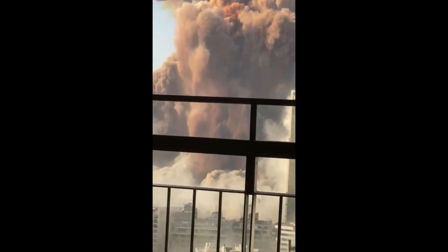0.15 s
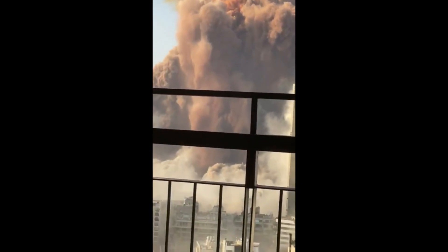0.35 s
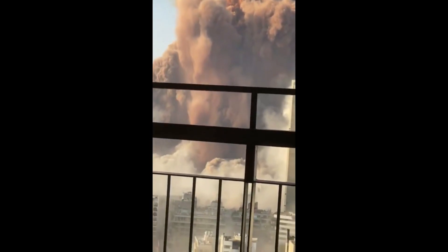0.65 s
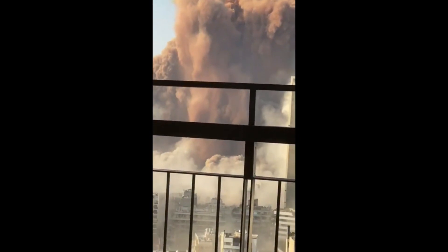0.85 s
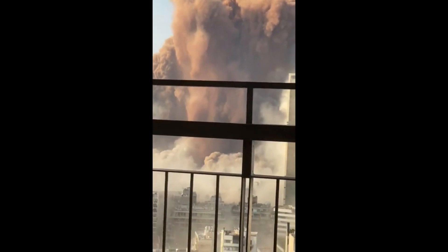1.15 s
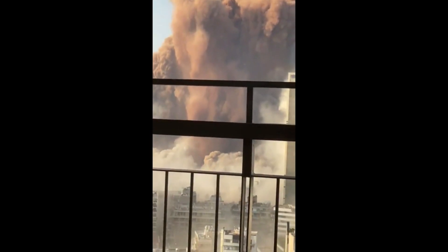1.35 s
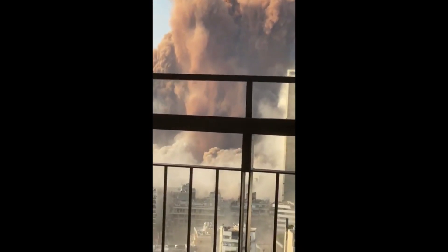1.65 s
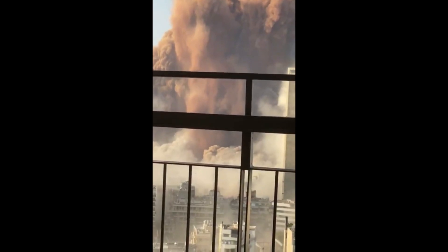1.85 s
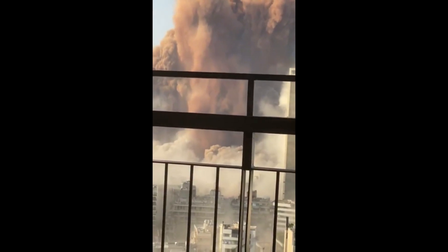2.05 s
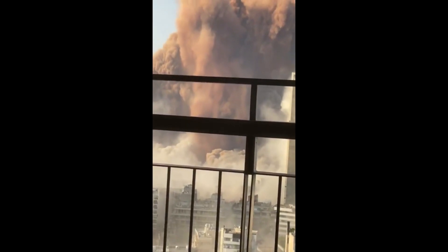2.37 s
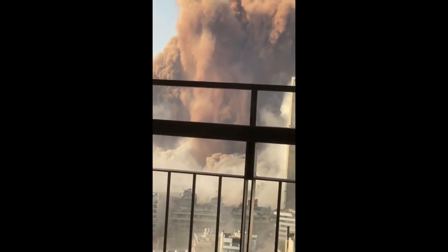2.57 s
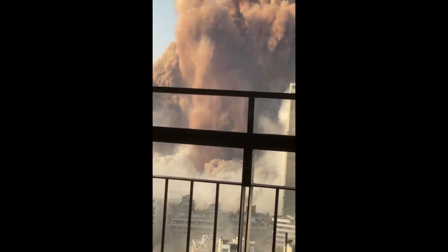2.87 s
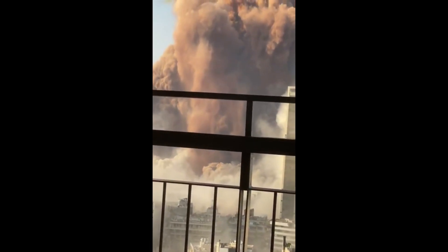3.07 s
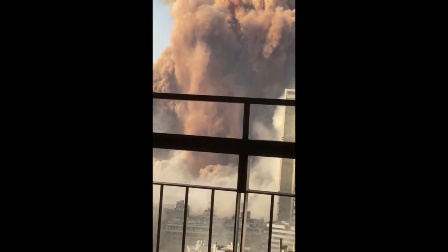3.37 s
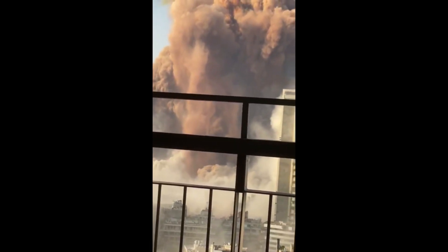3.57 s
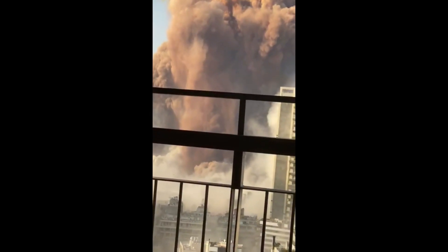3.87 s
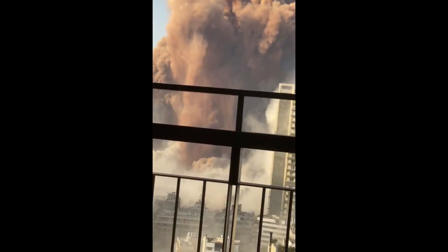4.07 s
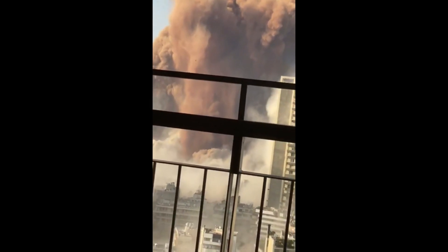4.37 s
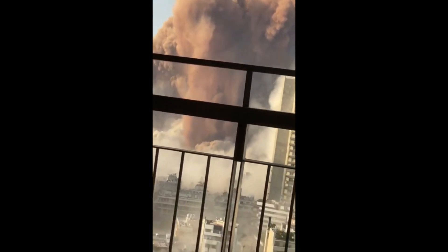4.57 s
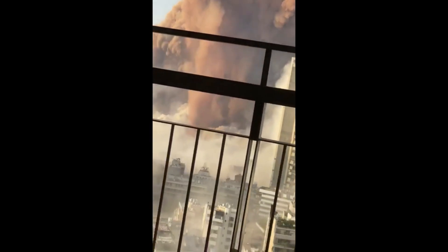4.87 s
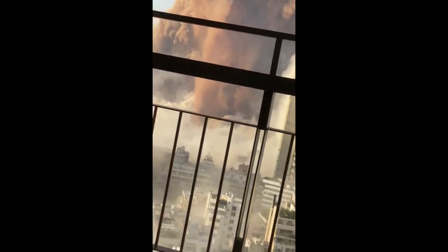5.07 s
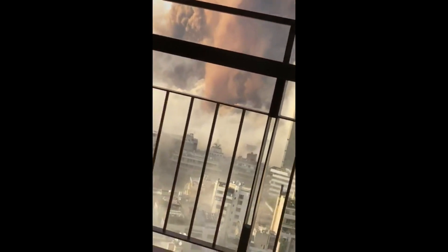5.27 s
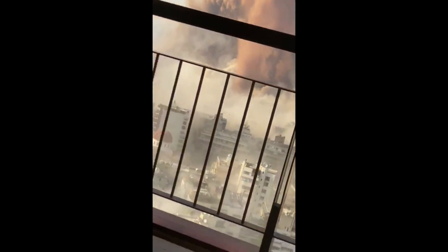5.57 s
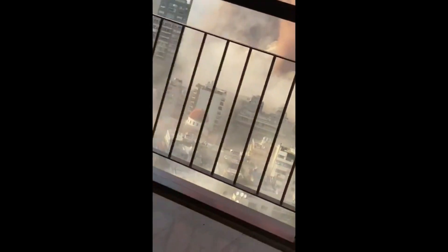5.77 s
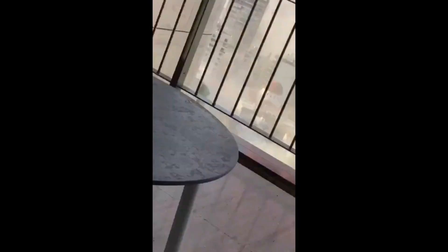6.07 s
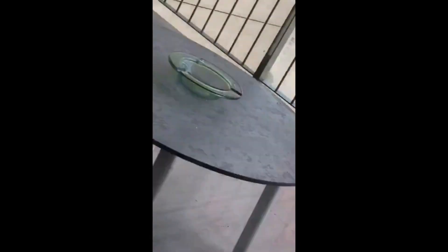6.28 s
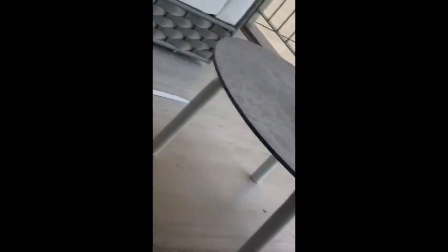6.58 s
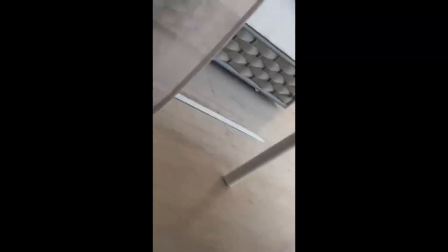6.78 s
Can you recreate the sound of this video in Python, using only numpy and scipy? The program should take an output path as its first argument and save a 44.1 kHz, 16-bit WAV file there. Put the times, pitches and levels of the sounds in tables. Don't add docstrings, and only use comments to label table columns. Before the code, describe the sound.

Heavy thunderous roar keeps rolling and slowly grows, dotted with dry clicks, then a sharp sheet-metal bang, thin distant horns and a clattering finish.

```python
import sys
import numpy as np
from scipy import signal
from scipy.fft import rfft, irfft, next_fast_len
from scipy.io import wavfile
from scipy.ndimage import uniform_filter1d

SR = 44100
rng = np.random.default_rng(int(sys.argv[2]) if len(sys.argv) > 2 else 0)


def transcribe(u):
    v = np.clip(np.atleast_2d(u).T, -1, 1)
    q = np.round(v * 32767).astype(np.int16)
    wavfile.write(sys.argv[1], SR, q)


def undo_db(level):
    steps = np.asarray(level, float) / 20
    return 10 ** steps


N = 305613
T = np.arange(N) / SR
PADDED = next_fast_len(N + 4096)
HZ = np.arange(PADDED // 2 + 1) * SR / PADDED + 1e-3

# t/s, level/dB
NEARNESS_DB = [
    (0.0, -50.5),
    (1.41, -46.5),
    (1.6, -44.5),
    (3.82, -41),
    (4.09, -39),
    (5.83, -36.5),
    (5.96, -35.5),
    (6.31, -38),
    (6.93, -35),
]
# t/s, half length/s, thunder lift/dB, body lift/dB
SWELLS = [(.05, .08, 2.5, 4), (.32, .06, 6.5, 1.5), (.44, .03, .1, 4), (.74, .11, 7, 1.5),
          (1.01, .04, 6, .1), (1.16, .04, 3, 1.5), (1.3, .035, 5, 2), (1.8, .05, 6, .1),
          (2.0, .08, 3.5, .1), (2.24, .1, 3, .1), (2.72, .04, 7, .1), (2.82, .025, 4, .1),
          (3.26, .06, 3, 3), (3.46, .07, 4.5, .1), (3.62, .035, 6, .1), (3.73, .04, 3.5, .1),
          (3.86, .03, 4.5, .1), (3.99, .03, 6, 4), (4.1, .07, 1.5, 2.5), (4.41, .06, 6, 6),
          (4.66, .04, 4.5, 4), (4.79, .05, 8, 6), (5.1, .1, 2.5, .1), (5.23, .05, 1.5, 2.5),
          (5.6, .12, 2.5, 2.5), (5.94, .11, 9, 6), (6.31, .06, 8, 1.5), (6.44, .03, 5, .1),
          (6.63, .11, 4.5, 2), (6.86, .05, 8, 3)]
# f/Hz, density/dB per Hz
THUNDER_COLOUR = [(14, -60.5), (25, -28), (32, -20), (45, -4.5), (62, 1.5), (94, -1), (130, -5.5),
                  (170, -12.5), (260, -40.5), (440, -120)]
# f/Hz, density/dB per Hz
BODY_COLOUR = [(90, -14), (140, -3.5), (200, -1), (300, -5), (450, -12), (700, -20.5), (1100, -33),
               (2000, -60.5), (4000, -120)]
# f/Hz, density/dB per Hz
ROAR_COLOUR = [(250, -10.5), (450, 1), (700, 0), (1000, -2.5), (1750, -5), (2600, -12), (3700, -20.5),
               (5500, -29), (8000, -40.5), (11500, -51.5)]
# f/Hz, density/dB per Hz
HISS_COLOUR = [(1500, -20), (3000, 0), (5000, -4.5), (8000, -14.5), (11500, -19.5), (13000, -40.5)]
# t/s, level/dB, centre f/Hz, width/octaves
TICKS = [(.352, -53, 4000, 1.3), (.472, -46, 3800, 1.9), (1.064, -43, 3400, .9), (1.36, -57, 5000, 1.4),
         (1.55, -58, 7500, 1.2), (1.71, -57, 6600, .25), (1.738, -54, 6600, .25), (2.445, -45, 5500, 1.5),
         (4.96, -54, 7900, .2), (5.07, -52, 7800, .2), (5.075, -53, 6100, .15), (5.52, -51, 5200, .5),
         (6.09, -44, 3100, .2), (6.585, -60, 9000, .9), (6.742, -48, 6500, 1.3), (6.77, -50, 10500, .35)]
# t/s, level/dB, centre f/Hz, width/octaves, t60/s
SPILLS = [
    (.485, -52, 3500, 1.4, .5),
    (1.064, -55, 4970, .71, .6),
    (2.447, -49.5, 5200, .6, .35),
    (3.45, -64, 10800, .3, .3),
    (5.43, -62, 11250, .03, .6),
    (5.56, -57, 7200, .8, .4),
    (5.96, -42, 2500, .4, .54),
    (6.76, -45, 5500, .9, 1.1),
]
# f/Hz, density/dB per Hz
GRIT_COLOUR = [(1800, -10), (3000, 1), (4500, -1), (6200, -5), (8000, -4), (10500, 0.5), (11300, -14)]
# start/s, end/s, f/Hz, level/dB
HORNS = [(4.6, 5.0, 3101, -54.5), (5.32, 5.53, 3103, -46.5), (5.54, 5.63, 3103, -52),
         (5.68, 5.78, 3101, -49), (5.9, 5.99, 3101, -48.5), (6.06, 6.12, 3101, -48),
         (5.23, 5.48, 3494, -54), (5.52, 5.76, 3494, -55), (5.28, 5.7, 2662, -53.5),
         (5.9, 6.12, 2665, -51.5), (4.6, 4.75, 3989, -61), (5.4, 5.9, 3989, -64), (6.18, 6.42, 3989, -58.5),
         (5.3, 5.6, 3193, -57), (6.66, 7.0, 1461, -44), (6.68, 7.0, 974, -47.5), (6.62, 6.8, 1211, -50)]
# t/s, level/dB, rise/s, first t60/s, late level/dB, late t60/s
BLOW = (4.758, -23.5, 0.014, .27, -4, .6)
# f/Hz, width/Hz, level/dB
SHEET_MODES = [(2010, 140, 6), (2470, 80, -6), (3200, 90, -4), (3500, 89, -6), (4390, 200, -11),
               (6140, 120, -6), (7730, 120, -13), (8340, 270, -16.5)]
# f/Hz, density/dB per Hz
CRASH_COLOUR = [(300, -14.5), (1000, -8), (2200, -7.5), (3500, -8.5), (5000, -13), (6500, -17),
                (8500, -19.5), (11500, -25), (13000, -45.5)]
# f/Hz, level/dB, t60/s
GLASS_MODES = [(10115, -40, 1.3), (10060, -46, 1.0), (9960, -46, .8), (10190, -45, .8)]
# f/Hz, left lead/rad
LEAD_RAD = [(0, 0), (1980, -0.0), (2580, 1.2), (3270, 0.12), (4130, 0.0), (4570, 1.45), (4910, 4),
            (5250, 6.3), (6800, 6.5), (7670, 7.4), (8010, 7.5), (9220, 9.0), (10200, 9.5), (11200, 9.5)]
# f/Hz, left minus right/dB
TILT_DB = [(60, 0.05), (96, 0.05), (150, -0.1), (250, 0.1), (400, 0.5), (640, 2.5), (1030, 3), (1660, 0.5),
           (2660, 0.0), (4270, 0.0), (6870, 0.1), (11000, 0.1)]
# f/Hz, level/dB
SCATTER_DB = [(60, -34), (300, -22), (700, -14), (1300, -15), (1900, -15.5), (2600, -6.5), (3600, -16),
              (4900, -15.5), (6000, -16.5), (8000, -2.5), (10500, -3.5)]


def rms_one(x):
    return x / np.sqrt(np.mean(x ** 2) + 1e-20)


def at_hz(points, hz=HZ):
    marks, value = np.transpose(points)
    return np.interp(np.log(hz), np.log(marks), value)


def shaped(gain):
    spectrum = rfft(rng.standard_normal(PADDED)) * gain
    return rms_one(irfft(spectrum, PADDED)[:N])


def noise(colour):
    low_cut = np.minimum(HZ / colour[0][0], 1) ** 4
    return shaped(undo_db(at_hz(colour)) * low_cut)


def drift(rate_hz):
    pole = np.exp(-128 * np.pi * rate_hz / SR)
    white = rng.standard_normal(N // 64 + 1002)
    slow = signal.lfilter([1], [1, -2 * pole, pole * pole], white)[1000:]
    return np.interp(np.arange(N) / 64, np.arange(len(slow)), rms_one(slow - slow.mean()))


def burst(since_s, rise_s, t60_s):
    decay = undo_db(-60 * np.maximum(since_s - rise_s, 0) / t60_s)
    return np.clip(since_s / rise_s, 0, 1) * decay


def bump(t, centre_s, half_s):
    return np.exp(-((t - centre_s) / half_s) ** 2)


def nearness():
    return np.interp(T, *np.transpose(NEARNESS_DB))


def rolling(mean_db, follows, column):
    near = nearness()
    steps = T[::64]
    lift_db = sum(row[column] * bump(steps, row[0], row[1]) for row in SWELLS)
    return mean_db + follows * (near - near.mean()) + np.interp(T, steps, lift_db)


def thunder():
    deep = noise(THUNDER_COLOUR)
    power = uniform_filter1d(deep ** 2, size=2600)
    swell = np.sqrt(uniform_filter1d(power, size=1300))
    evened = rms_one(deep / swell ** 0.68)
    return undo_db(rolling(-26.5, 0.15, column=2)) * evened


def roll():
    gust_db = 0.4 * drift(3)
    body = undo_db(rolling(-31, 0.3, column=3)) * noise(BODY_COLOUR)
    roar_db = nearness() + 3 + 0.56 * drift(6) + gust_db
    roar = undo_db(roar_db) * noise(ROAR_COLOUR)
    hiss_db = -62.7 + 0.4 * T + 1.1 * drift(6.9) + gust_db
    hiss = undo_db(hiss_db) * noise(HISS_COLOUR)
    return body + roar + hiss


def debris():
    tick_t60_s, tick_rise_s, spill_rise_s = 0.11, 0.004, 0.011
    ticks = [(*row, tick_t60_s, tick_rise_s) for row in TICKS]
    spills = [(*row, spill_rise_s) for row in SPILLS]
    out, white = np.zeros(N), rng.standard_normal(N)
    for start_s, db, hz, octaves, t60_s, rise_s in ticks + spills:
        edges_hz = np.minimum(hz * 2 ** (np.array([-0.5, 0.5]) * octaves), 0.45 * SR)
        band = signal.butter(3, edges_hz, "band", fs=SR, output="sos")
        span = slice(round(start_s * SR), round((start_s + rise_s + t60_s) * SR))
        crack = rms_one(signal.sosfilt(band, white[span]))
        out[span] += undo_db(db) * crack * burst(T[span] - start_s, rise_s, t60_s)
    return out


def grit():
    start_s, end_s, flow_db = 0.6, 0.94, -54
    rise_db_per_s, fall_db_per_s = 130, 330
    before_db = rise_db_per_s * np.maximum(start_s - T, 0)
    after_db = fall_db_per_s * np.maximum(T - end_s, 0)
    gush_db = 3.5 * bump(T, 0.74, half_s=0.04)
    clumps_db = 3 * drift(30)
    return undo_db(flow_db - before_db - after_db + gush_db + clumps_db) * noise(GRIT_COLOUR)


def horns():
    rise_s, t60_s = 0.036, 0.2
    out, flutter, waver = np.zeros(N), drift(9), drift(9)
    for k, (start_s, end_s, hz, db) in enumerate(HORNS):
        span = slice(round(start_s * SR), round((end_s + 0.3) * SR))
        t = T[span]
        held = np.clip((t - start_s) / rise_s, 0, 1) * undo_db(-60 * np.maximum(t - end_s, 0) / t60_s)
        own = slice(k * 8000, k * 8000 + len(t))
        level = undo_db(db + 3.5 + 2.2 * flutter[own])
        out[span] += level * held * np.sin(2 * np.pi * hz * t + 0.7 * waver[own])
    return out


def sheet():
    start_s, db, rise_s, t60_s, late_db, late_t60_s = BLOW
    since_s = T - start_s
    crash = noise(CRASH_COLOUR) * burst(since_s, rise_s, t60_s)
    dulled = shaped(undo_db(at_hz(CRASH_COLOUR)) / (1 + (HZ / 8500) ** 6))
    walls = undo_db(late_db) * dulled * burst(since_s, 1.2 * rise_s, late_t60_s)
    modes = sum(undo_db(mode_db) / (1 + (2 * (HZ - hz) / width_hz) ** 2) for hz, width_hz, mode_db in SHEET_MODES)
    ringing = burst(since_s - 0.006, 0.008, 0.17) + undo_db(-5) * burst(since_s, rise_s, 0.75)
    ring = undo_db(-1.5) * shaped(modes) * ringing
    rattle_db = 0.9 * drift(60)
    return undo_db(db - 1.5 + rattle_db) * (crash + walls + ring)


def glass():
    since_s = T - 6.777
    return sum(undo_db(db) * burst(since_s, 0.003, t60_s) * np.sin(2 * np.pi * hz * T)
               for hz, db, t60_s in GLASS_MODES)


def scene():
    mono = thunder() + roll() + debris() + grit() + horns() + sheet() + glass()
    return np.array([mono, mono])


def thrifty_stereo(left, right):
    weak_db, masked_db, whim_db = -9.8, -42, 3.5
    top_hz, top_db_per_octave = 7500, 15
    whole_below_hz, bins = 1300, 10
    sum_diff = np.array([left + right, left - right]) / 2
    hz, _, pair = signal.stft(sum_diff, SR, nperseg=2048, noverlap=1024)
    scramble = np.exp(2j * np.pi * rng.random(pair.shape))
    pair = pair + undo_db(at_hz(SCATTER_DB, hz + 1))[:, None] * scramble * pair[::-1]

    starts = np.arange(0, 1025, bins)
    band_hz = hz[starts]
    power = np.add.reduceat(np.abs(pair) ** 2, starts, axis=1)
    treble = power[:, band_hz > 2000].sum(axis=(0, 1))
    usual = np.median(treble)
    octaves_up = np.log2(np.maximum(band_hz / top_hz, 1))
    under_db = masked_db + np.outer([top_db_per_octave, 0], octaves_up)
    masking = undo_db(2 * under_db)[..., None] * usual * (treble / usual) ** 0.7

    judged = power * undo_db(2 * whim_db * rng.standard_normal(power.shape))
    keep = (judged > undo_db(2 * weak_db) * power[::-1]) & (judged > masking)
    keep[:, band_hz < whole_below_hz] = True
    kept = pair * np.repeat(keep, bins, axis=1)[:, :1025]
    mid, side = signal.istft(kept, nperseg=2048, noverlap=1024)[1][:, :N]
    return np.array([mid + side, mid - side])


def low_pass(x):
    return signal.sosfilt(signal.butter(12, 11630, fs=SR, output="sos"), x)


def record(dry):
    phase_rad = np.interp(HZ, *np.transpose(LEAD_RAD))
    split = undo_db(at_hz(TILT_DB) / 2) * np.exp(0.5j * phase_rad)
    left, right = irfft(rfft(dry, PADDED) * np.array([split, 1 / split]), PADDED)[:, :N]
    return low_pass(thrifty_stereo(left, right))


dry = scene()
out = record(dry)
transcribe(out)
```